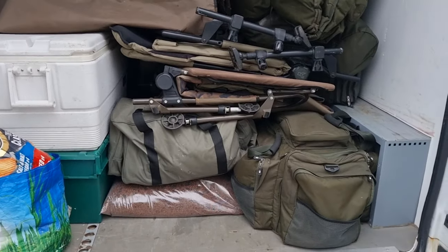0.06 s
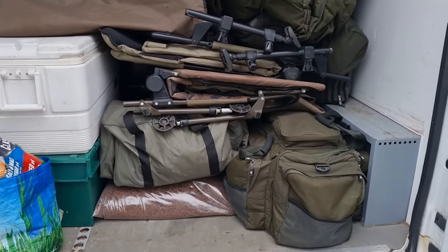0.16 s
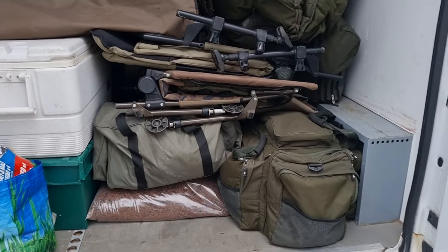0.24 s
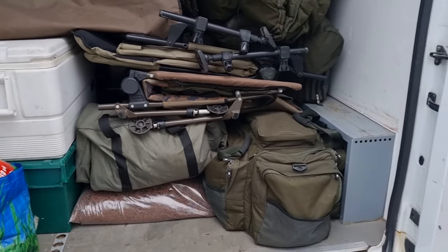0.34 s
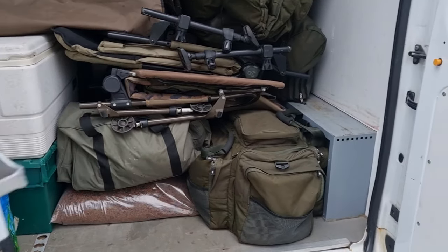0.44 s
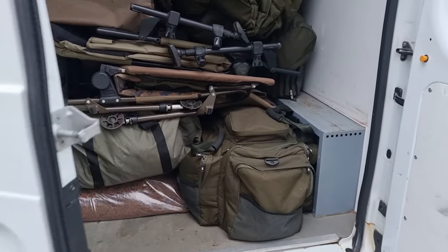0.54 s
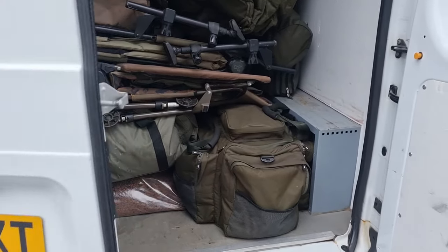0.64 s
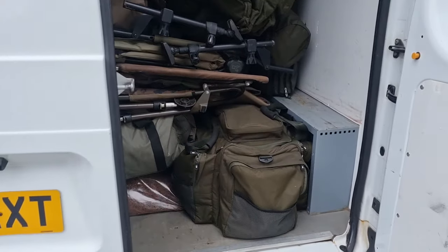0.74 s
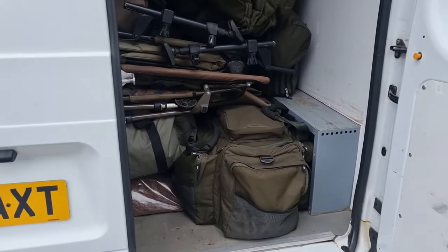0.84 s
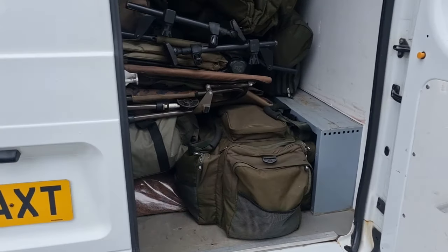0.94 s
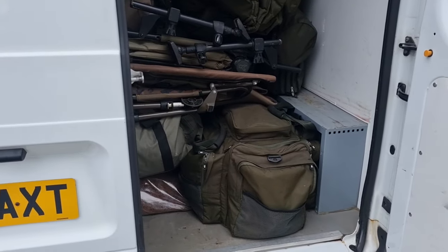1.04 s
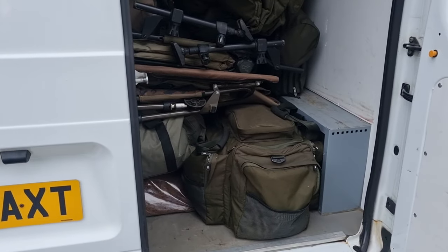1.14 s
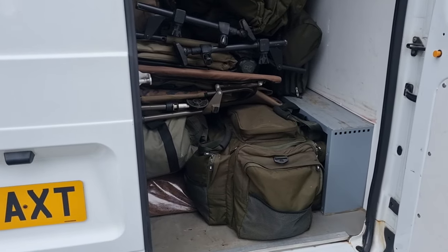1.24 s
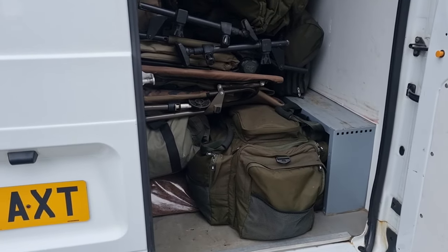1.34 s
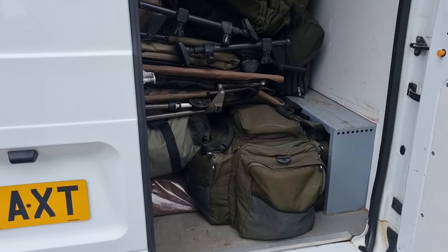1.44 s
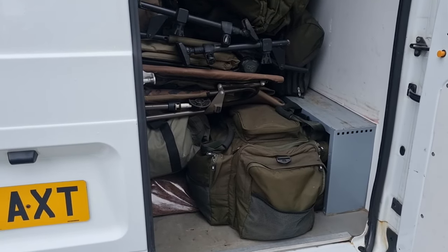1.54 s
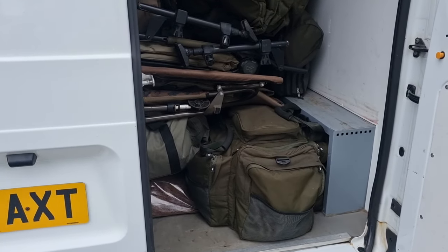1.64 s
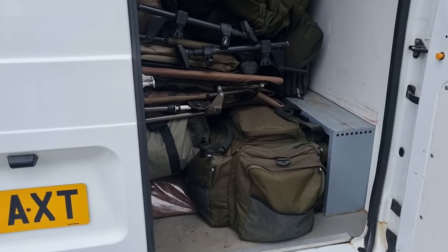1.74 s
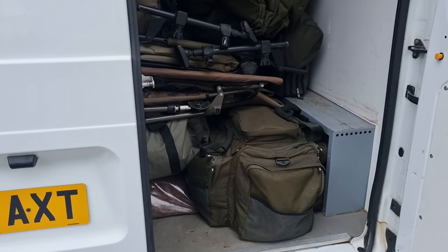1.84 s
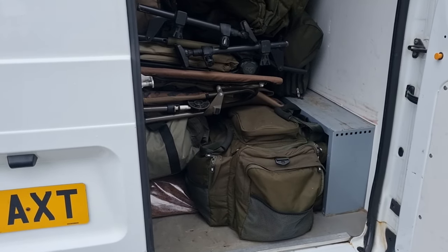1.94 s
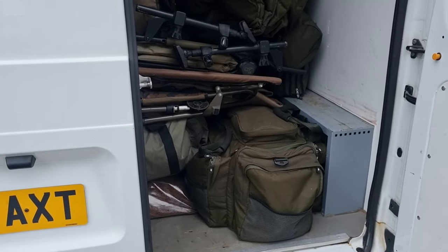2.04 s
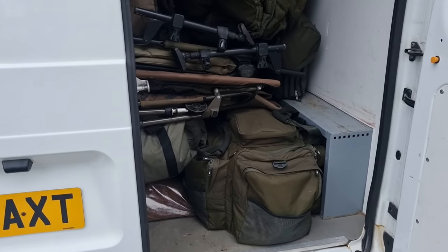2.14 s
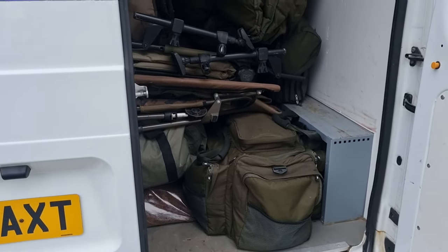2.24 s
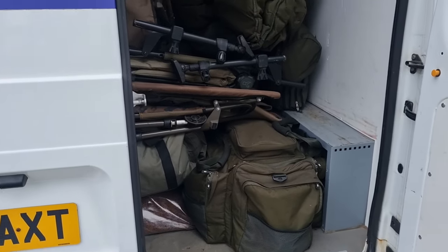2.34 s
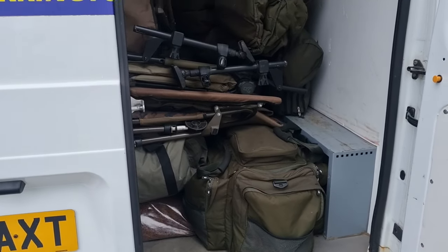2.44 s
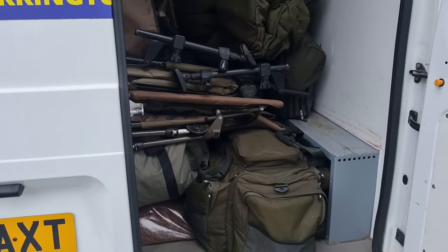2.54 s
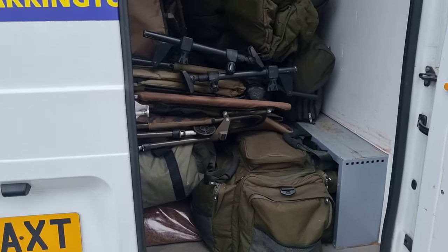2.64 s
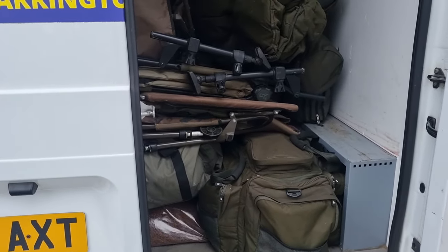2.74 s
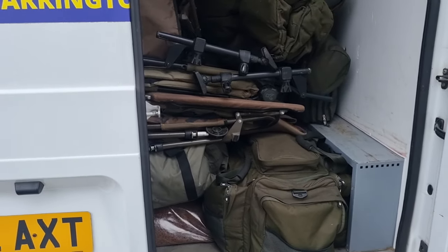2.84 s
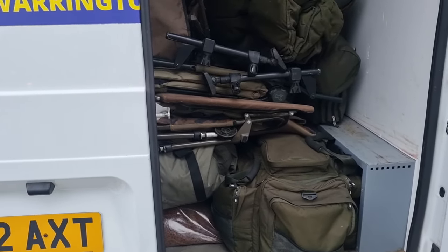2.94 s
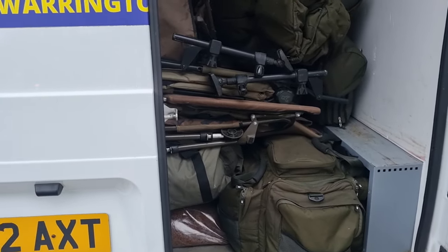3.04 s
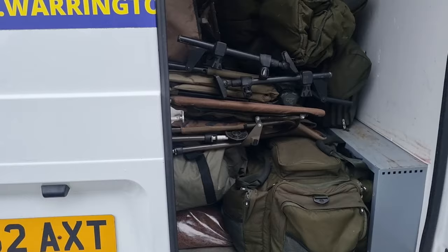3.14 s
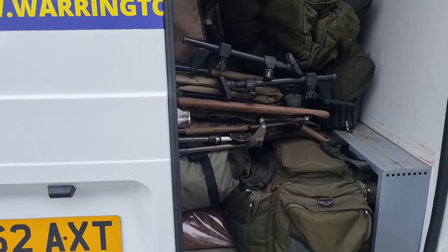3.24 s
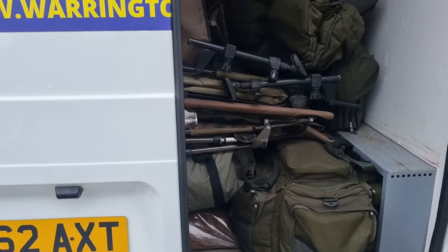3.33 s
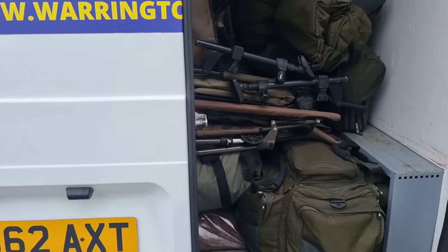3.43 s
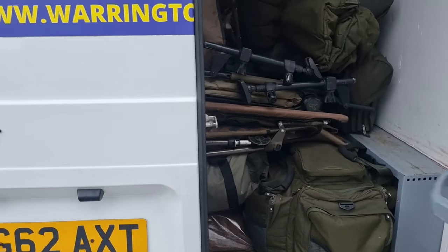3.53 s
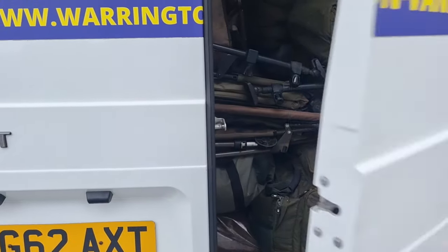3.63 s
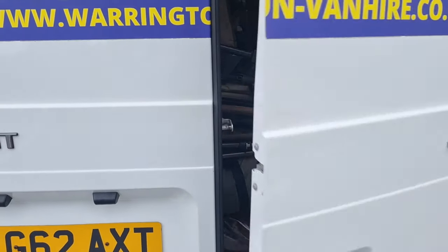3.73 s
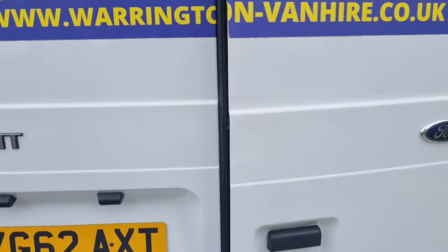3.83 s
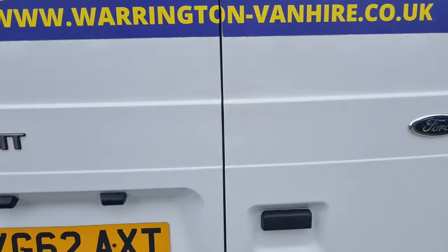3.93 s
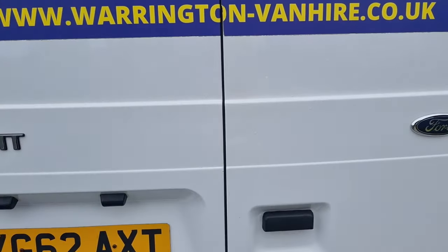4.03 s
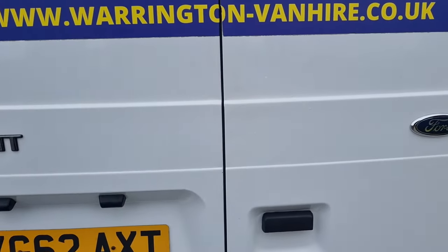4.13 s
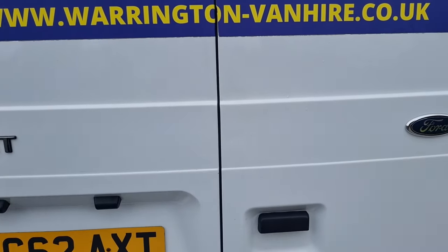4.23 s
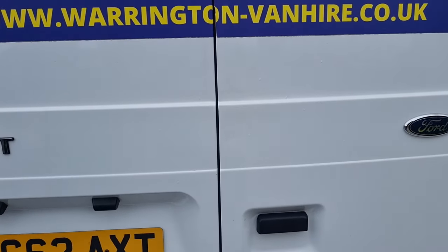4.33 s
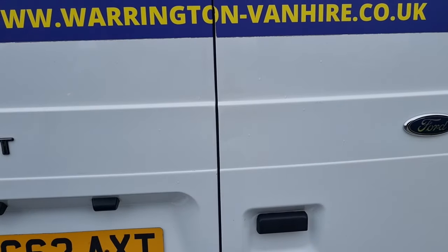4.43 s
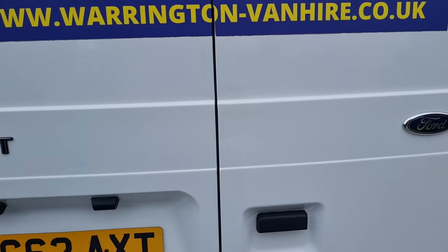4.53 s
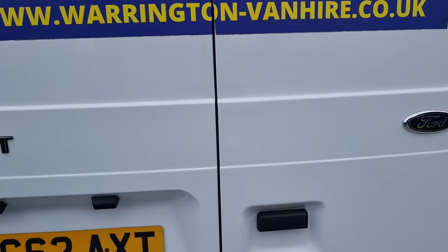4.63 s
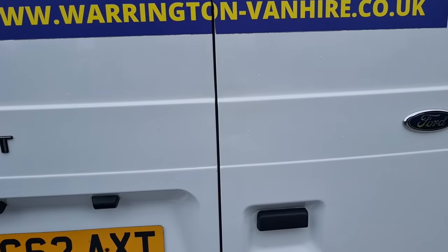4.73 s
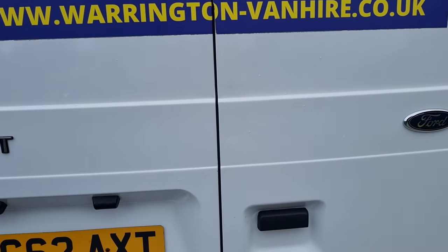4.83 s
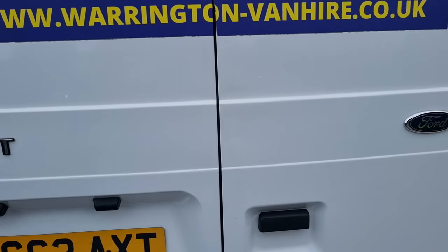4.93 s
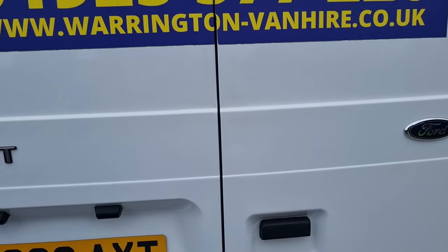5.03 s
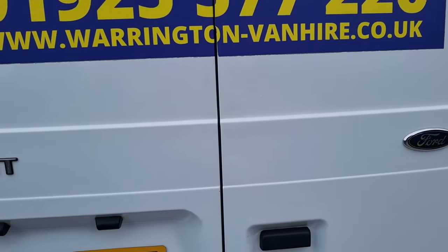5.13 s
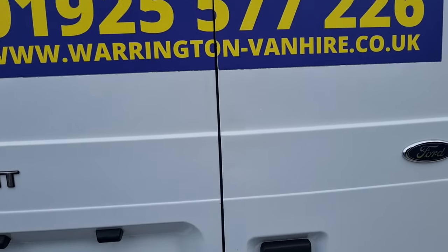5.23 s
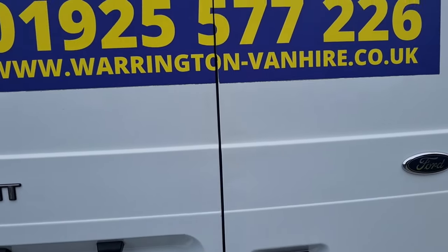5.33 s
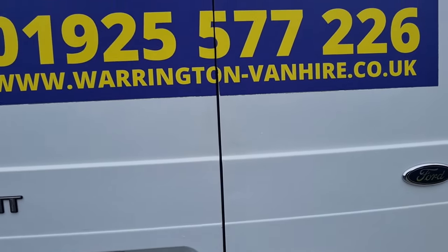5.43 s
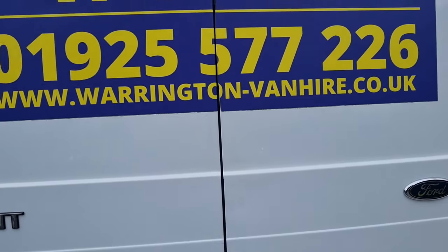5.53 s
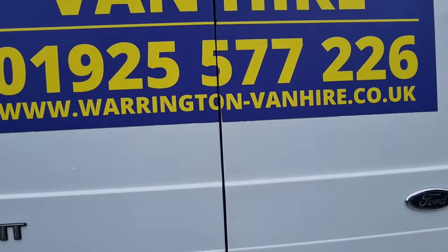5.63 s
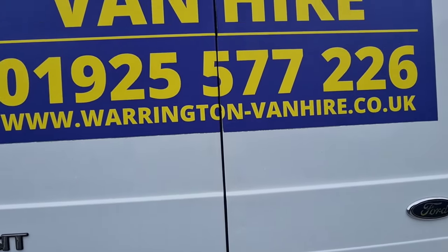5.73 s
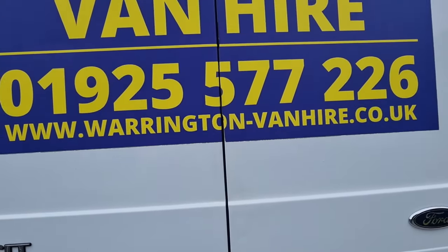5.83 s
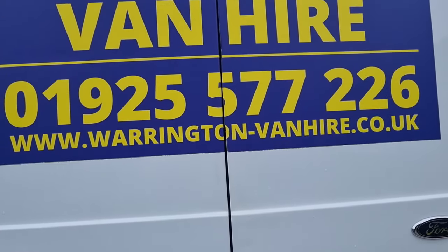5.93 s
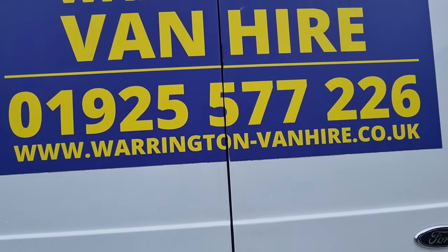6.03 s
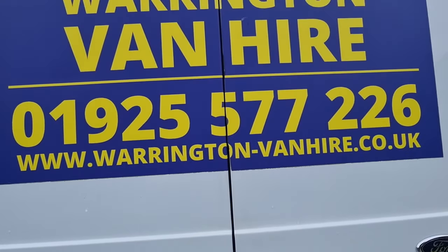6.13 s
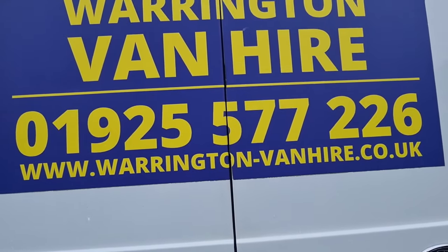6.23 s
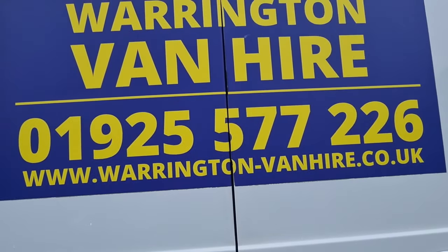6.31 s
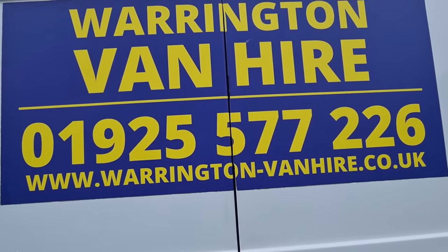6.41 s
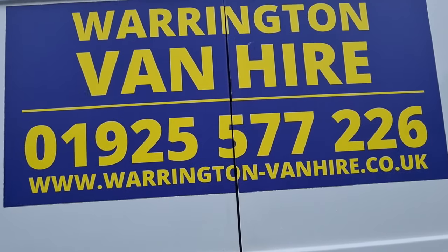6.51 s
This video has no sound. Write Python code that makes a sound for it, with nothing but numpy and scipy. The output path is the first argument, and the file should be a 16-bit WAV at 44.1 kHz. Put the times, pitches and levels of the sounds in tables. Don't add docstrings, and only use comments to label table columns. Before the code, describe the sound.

Outdoors on a street, a heavy vehicle swells past with engine rumble, tyre roar and whine. Around one second a loaded van's rear door slams very close, a cracking latch over booming sheet metal and loose rattles. As the vehicle recedes, small clicks and thin, high brake squeals follow. At four seconds the second door slams, thuddier, then quiet traffic hum remains. Handheld stereo microphone, loudest hits slightly clipped.

```python
import sys
import numpy as np
from scipy import signal
from scipy.fft import rfft, irfft, next_fast_len
from scipy.io import wavfile
from scipy.ndimage import uniform_filter1d

SR = 44100
rng = np.random.default_rng(int(sys.argv[2]) if len(sys.argv) > 2 else 0)


def decibels_to_gain(level_db):
    exponent = np.asarray(level_db, float) / 20
    return 10 ** exponent


def materialize(psi):
    bounded = np.clip(np.atleast_2d(psi).T, -1, 1)
    quanta = np.round(bounded * 32767).astype(np.int16)
    wavfile.write(sys.argv[1], SR, quanta)


N = 289737

# pitch in Hz, likeness from -1 to 1.
STREET_LIKENESS = [(60, 0.83), (130, 0.95), (290, 0.67), (640, -0.54), (1410, -0.52), (3100, 0.024),
                   (6820, -0.03), (15000, -0.57)]
# pitch in Hz, likeness from -1 to 1.
VAN_LIKENESS = [(60, 0.97), (250, 0.98), (600, 0.84), (4000, 0.21)]
# multiple of the pitch, level in dB at full grip.
SQUEAL_OVERTONES = [(1, 3.5), (2, -15.5), (3, -35), (4, -53)]


def evened(x):
    return x / np.sqrt(np.mean(x ** 2) + 1e-20)


def read(points, hz):
    f, value = np.transpose(points)
    return np.interp(np.log(hz + 1), np.log(f + 1), value)


def add(mix, s, sound):
    part = mix[:, round(s * SR):][:, :sound.shape[1]]
    part += sound[:, :part.shape[1]]


def panned(x, db):
    return x * np.array([decibels_to_gain(db / 2), decibels_to_gain(-db / 2)]).reshape(2, -1)


def drift(n, hz):
    pole = np.exp(-2 * np.pi * hz / SR)
    return evened(signal.lfilter([1], [1, -2 * pole, pole ** 2], rng.standard_normal(n)))


def slope(hz, lo_hz, hi_hz):
    return 1 / np.sqrt((1 + (lo_hz / (hz + 1)) ** 8) * (1 + (hz / hi_hz) ** 8))


def coloured(n, gain, alike=STREET_LIKENESS, lag_ms=0):
    size = next_fast_len(n)
    hz = np.fft.rfftfreq(size, 1 / SR)
    a, b = rfft(rng.standard_normal((2, size)))
    same = np.clip(read(alike, hz), -1, 1)
    late = np.exp(-2j * np.pi * hz * lag_ms / 1000)
    pair = np.array([a * late, same * a + np.sqrt(1 - same ** 2) * b])
    return evened(irfft(pair * gain(hz), size)[:, :n])


def nearness(t):
    # time in seconds, level in dB compared with the closest moment.
    traffic = [(0, -14), (.27, -13.5), (.48, -4), (.69, -1.5), (.93, 0), (1.15, -9.5), (1.45, -14),
               (1.98, -17), (2.21, -21), (3.0, -24.5), (3.35, -23.5), (3.77, -25.5), (4.6, -28),
               (4.96, -30.5), (5.3, -30.5), (5.85, -22.5), (6.25, -22.5), (6.57, -20)]
    return np.interp(t, *np.transpose(traffic))


def street():
    # pitch in Hz, level in dB per Hz.
    street_colour = [(15, -39.5), (25, -3.5), (53, 5), (86, -0.5), (179, -17.5), (235, -8.5), (324, -15.5),
                     (620, -26.5), (769, -22.5), (981, -23), (2030, -29), (3680, -35), (6310, -42.5),
                     (7600, -50), (9300, -64), (11000, -64.5), (13500, -59.5), (15800, -58)]
    # level in dB at closest, share of nearness, change in dB once both doors are shut.
    bands = [
        (-39.5, 0.24, -1.5),
        (-35.5, 0.6, -2),
        (-39.5, 0.6, 0),
        (-42, 1, -2),
        (-50.5, 0.89, 2),
        (-45.5, 0.92, -6),
    ]
    edges_hz = [55, 450, 1100, 2800, 5000, 8500, 20000]
    t = np.arange(N) / SR
    shut = t > 4.1
    colour = lambda hz: decibels_to_gain(read(street_colour, hz))
    out = decibels_to_gain(-105) * rng.standard_normal((2, N))
    out += decibels_to_gain(-56.5) * coloured(N, lambda hz: colour(hz) * slope(hz, 20, 55))
    streaks_db = 2.4 * rng.standard_normal(1200)
    streaks_hz = np.linspace(0, SR / 2, len(streaks_db))
    comb = lambda hz: decibels_to_gain(np.interp(hz, streaks_hz, streaks_db))
    for lo_hz, hi_hz, (db, share, shut_db) in zip(edges_hz[:-1], edges_hz[1:], bands):
        noise = coloured(N, lambda hz: colour(hz) * slope(hz, lo_hz, hi_hz) * comb(hz))
        patches_db = 1.55 * drift(N, 3.8)
        out += decibels_to_gain(db + share * nearness(t) + shut_db * shut + patches_db) * noise
    return out


def whine(start, end, from_hz, to_hz, db, spread, share, fade):
    n = round((end - start) * SR)
    hz = np.linspace(from_hz, to_hz, n)
    a, b = (drift(n, spread * from_hz) + 1j * drift(n, spread * from_hz) for _ in "ab")
    same = np.clip(read(STREET_LIKENESS, hz.mean()), -1, 1)
    pair = np.array([a, same * a + np.sqrt(1 - same ** 2) * b])
    pair = pair / (abs(pair) + 0.33) ** 0.78
    carried = (pair * np.exp(2j * np.pi * np.cumsum(hz) / SR)).real
    near_db = share * nearness(start + np.arange(n) / SR)
    return start, decibels_to_gain(db + near_db + 4.5) * carried * signal.windows.tukey(n, np.clip(fade, 0, 1))


def turning_parts(mix):
    # start in seconds, end in seconds, first pitch in Hz,
    # last pitch in Hz, level in dB at closest.
    tyres = [(0.48, .92, 2700, 2850, -42.5), (.3, 1.5, 2580, 2800, -41.5), (0.29, .97, 1800, 1880, -44.5),
             (.35, 0.79, 3600, 4000, -46)]
    drones = [(0, 0.955, 565, 574.3, -43), (0, 3.5, 290.6, 292.7, -45.5)]
    gears = [(1, 3.4, 7230, 6740, -53), (1.2, 2.95, 15600, 15200, -48), (1.95, 2.12, 15420, 15330, -46),
             (3.02, 3.3, 15150, 15060, -54), (1.6, 2.1, 8270, 8420, -62), (4.279, 4.56, 4500, 4900, -42.5),
             (5.7, 6.1, 5500, 5500, -66)]
    idle = [(.77, .96, 430, 436, -34), (0, 1.2, 152, 154.3, -47), (0, 0.946, 226.1, 229, -47.5),
            (0, 0.79, 416, 420.5, -43.5), (1.9, 4.1, 130.6, 146, -47), (5.5, 6.6, 149, 150, -50),
            (5, 6.605, 200, 226.7, -51.5), (5.503, 6.052, 95, 110.6, -46.5), (6.201, 6.7, 106.9, 119, -42)]
    motors = [(0.76, 1.2, 720, 780, -42.5), (5.55, 6.9, 1408, 1412, -44), (5.82, 6.05, 1411, 1410, -45),
              (5.7, 5.98, 4820, 4810, -64.5), (3.34, 3.405, 12900, 13100, -52), (4.8, 7.4, 888, 872, -49),
              (6.1, 6.5, 2465, 2480, -53.5), (6.45, 6.6, 2480, 2475, -51), (5.8, 6.0, 2720, 2720, -54),
              (1.7, 3.4, 1210, 1190, -50), (4.8, 5.05, 150, 170, -40.5), (3.34, 3.41, 5780, 5790, -51)]
    line_kinds = [
        (0.11, 0.92, 0.14),
        (0.18, 0.37, 0.081),
        (0.004, 0.88, 0.3),
        (.03, 0.26, 0.096),
        (0.005, 0.48, 0.21),
    ]
    for rows, kind in zip((tyres, drones, gears, idle, motors), line_kinds):
        for row in rows:
            add(mix, *whine(*row, *kind))


def tone(hz, db, waver, rough_db):
    n = len(hz)
    turns = np.cumsum(hz * (1 + waver * drift(n, 27))) / SR + rng.random()
    gain = np.sqrt(2) * decibels_to_gain(db + rough_db * drift(n, 35)) * signal.windows.tukey(n, .04)
    return gain, turns


def engine(mix):
    # start in seconds, end in seconds, pitch in Hz, level in dB.
    surges = [(0, 0.063, 72, -36.5), (0.093, 0.387, 72.5, -32), (0.36, 0.532, 75, -32.5),
              (0.534, 0.688, 74.7, -34), (0.696, 0.82, 70.6, -37), (0.829, 0.948, 70.5, -45),
              (1.293, 1.49, 68, -46), (1.437, 1.74, 64.6, -27.5), (1.743, 1.84, 68, -38),
              (1.882, 2.846, 69.26, -47.5), (2.853, 3.651, 68.8, -39), (3.655, 3.803, 65, -50),
              (3.796, 4.096, 71.6, -42.5), (4.558, 4.642, 70.5, -33), (4.651, 4.776, 72.2, -39.5),
              (4.754, 4.962, 73.6, -41.5), (5.014, 5.185, 68, -43), (5.204, 5.39, 68, -53),
              (5.393, 5.7, 75.2, -47.5)]
    for start, end, hz, db in surges:
        n = round((end - start) * SR)
        gain, turns = tone(np.full(n, hz), db, 0.005, 0.47)
        swell = np.hanning(n) ** 0.35
        add(mix, start, panned(gain * swell * np.sin(2 * np.pi * turns), .3))


def overtones(turns, level_db, harshness, full_db):
    lag = np.array([[0], [1.8]])
    harsh = lambda k: harshness * max(k - 2, 0) * (level_db + full_db)
    angle = 2 * np.pi * turns + lag
    return sum(decibels_to_gain(db + harsh(k)) * np.sin(k * angle) for k, db in SQUEAL_OVERTONES)


def grab(middle, length, hz, db, pan_db):
    n = round(length * SR)
    flutter = 0.38
    level_db = db + 10 * np.log10(np.hanning(n) + 1e-4)
    gain, turns = tone(np.full(n, hz), level_db, 0.011 * flutter, 4.3 * flutter)
    stack = overtones(turns, level_db, 1.9, 35)
    return middle - length / 2, panned(gain * stack, pan_db)


def held(rows, waver):
    s, hz, db, pan_db = np.transpose(rows)
    t = np.arange(s[0], s[-1], 1 / SR)
    level_db = np.interp(t, s, db) - 0.5
    gain, turns = tone(np.interp(t, s, hz), level_db, waver, 1.3)
    stack = overtones(turns, level_db, 1.0, 36.5)
    return s[0], panned(gain * stack, np.interp(t, s, pan_db))


def squeal():
    # middle in seconds, length in seconds, pitch in Hz, level in dB,
    # left-right balance in dB.
    grabs = [(2.625, 0.1, 3280, -53.5, 6), (2.647, 0.058, 3130, -57, -4), (2.87, 0.057, 3210, -65, -1),
             (2.857, 0.099, 3280, -57, -1), (2.901, 0.179, 3195, -57.5, -3),
             (2.992, 0.042, 3250, -59.5, -4), (3.06, .1, 3200, -64.5, -2), (3.138, .08, 3350, -69, -2),
             (3.555, 0.075, 3314, -57.5, -9), (3.661, 0.13, 3390, -72, 2), (3.756, .12, 3340, -63.5, -4.5),
             (4.825, .04, 3300, -58.5, -1), (4.866, .05, 3318, -63, -3), (4.922, .06, 3312, -63, -1),
             (4.962, .03, 3310, -69, -4), (5.01, .05, 3300, -68, -6), (5.09, .1, 3320, -76.5, -5)]
    # time in seconds, pitch in Hz, level in dB,
    # left-right balance in dB.
    squeals = [
        [(2.655, 3170, -61, -10), (2.677, 3178, -35.5, -7), (2.729, 3235, -44, -3), (2.735, 3160, -50.5, 11),
         (2.769, 3166, -32.5, -7), (2.783, 3110, -45, -7.5), (2.815, 3120, -31.5, -1), (2.84, 3200, -69, -4)],
        [(3.795, 3174, -58, -7), (3.805, 3197, -42.5, -5), (3.815, 3154, -40, -5), (3.837, 3143, -54, -1.5),
         (3.879, 3177, -38, 0.5), (3.905, 3144, -45, 2)],
        [(3.9, 3167, -44, 2), (3.93, 3137, -35, -2.5), (3.944, 3164, -51.5, -5), (3.96, 3150, -42.5, 1),
         (3.984, 3106, -52, -10), (3.998, 3220, -51, -6.5), (4.026, 3190, -54, -4.0), (4.035, 3165, -69, 0)],
        [(4.56, 3332, -64, 0.5), (4.584, 3310, -54, 6), (4.644, 3323, -48, 5), (4.67, 3325, -62, 1),
         (4.71, 3313, -46.5, -4.5), (4.735, 3334, -50.5, -3), (4.772, 3314, -51, -4), (4.8, 3320, -54, -3),
         (4.814, 3320, -68, -3.5)],
    ]
    direct = np.zeros((2, N))
    for row in grabs:
        add(direct, *grab(*row))
    for rows, waver in zip(squeals, (0.0039, 0.0028, .003, 0.00083)):
        add(direct, *held(rows, waver))
    t = np.arange(round(.4 * SR)) / SR
    echoes = rng.standard_normal((2, len(t))) * decibels_to_gain(-60 * t / 0.21) * (t > .01)
    echoes *= decibels_to_gain(-10.5) / np.linalg.norm(echoes[0])
    echoes[:, 0] = 1
    return signal.fftconvolve(direct, echoes, axes=1)[:, :N]


def click(s, db, ring_hz, pan_db, tilt_db):
    hz, t = np.fft.rfftfreq(1024, 1 / SR), np.arange(512) / SR
    chips = 0.26 * rng.standard_normal((2, len(t))) * decibels_to_gain(-60 * t / .006)
    chips[:, 0] = 1
    colour = decibels_to_gain(tilt_db * np.log2((hz + 200) / 4000)) * slope(hz, 700, 16000)
    colour = colour * decibels_to_gain(-10 / (1 + ((hz - 9800) / 1500) ** 4))
    colour = colour * (1 + 3.0 / (1 + 2j * (hz - ring_hz) / 900))
    sound = np.roll(irfft(rfft(chips, 1024) * colour), 64, 1)
    return s - 64 / SR, panned(decibels_to_gain(db) * sound / abs(sound).max(), pan_db)


def knock(s, db, ring_hz, pan_db, tilt_db, t60, ring_gain=0.87, chatter_db=0.0, tail_db=-24):
    # pitch in Hz, level in dB per Hz.
    crack = [(350, -34), (600, -7.5), (943, -6.5), (1220, -3), (1310, -9.5), (1480, -2.5), (1820, -10.5),
             (4130, -14.5), (4740, -14), (7240, -16), (9020, -25.5), (13800, -23.5), (15800, -23.5)]
    t = np.arange(round(.2 * SR)) / SR
    bright_hz = 15500 if s > 3 else 13400
    bump = lambda hz, at_hz, width: 1 / (1 + ((hz - at_hz) / width) ** 2)
    ring = lambda hz: 1 + ring_gain * bump(hz, ring_hz, 250) + 1.9 * bump(hz, bright_hz, 910)
    lean = lambda hz: tilt_db * (np.log2((hz + 50) / 4000) + (hz / 11000) ** 2)
    colour = lambda hz: decibels_to_gain(read(crack, hz) + lean(hz)) * ring(hz)
    chatter = decibels_to_gain(chatter_db * drift(len(t), 300))
    dying = decibels_to_gain(-60 * t / max(t60, .008)) + 0.508 * decibels_to_gain(-60 * t / 0.0069)
    tail = decibels_to_gain(tail_db - 60 * t / 0.56)
    shape = (1 - np.exp(-t / 0.0011)) * (chatter * dying + tail)
    shape *= np.minimum((t[-1] - t) / 0.1, 1)
    return s, panned(decibels_to_gain(db - 5.0) * shape * coloured(len(t), colour, VAN_LIKENESS, 0.301), pan_db)


def small_parts(mix):
    # time in seconds, peak in dB, ringing pitch in Hz,
    # left-right balance in dB, brightness in dB per octave.
    taps = [(1.9984, -45, 4250, 8, -1.5), (2.592, -44, 4400, -8, -2.3), (3.017, -45, 4650, -4, 0),
            (3.0779, -50, 6800, -10, 2.5), (3.4211, -22, 7700, 4, 3.5), (3.4225, -32.5, 2250, -5, 1),
            (5.39, -45.5, 3600, 6, -3.5), (3.4375, -37.5, 7600, -1, -0.5), (3.9544, -48, 3600, -7, 0)]
    rattles = [(1.0054, -18, 7500, -6, 2.5), (1.0254, -24, 3450, -3, 1), (1.054, -17.5, 3040, 5, 1.5),
               (1.060, -27, 3500, 4, -2), (1.089, -17, 2100, 5.5, 3), (1.1124, -23.5, 5500, 7, -4.5),
               (4.1744, -22, 6200, -6.5, -3), (4.184, -26, 6000, -3, -2.5), (4.1979, -24, 3570, 0.5, -2.5),
               (4.2069, -26, 2600, -4, -4), (4.2189, -25.5, 2200, 0, -4.5), (4.235, -23, 6360, -5.5, -4.5),
               (4.244, -25.5, 6000, -3, -5.5), (4.2593, -28.5, 7400, -5, -1), (4.267, -28.5, 3000, -7, -3)]
    ticks = [(4.1395, -33, 12000, -2, 4), (1.0555, -14, 2100, 3.5, 2), (1.0895, -11, 13800, 2, 5),
             (4.0605, -7.5, 2000, -3, -1.5), (4.0625, -0.5, 820, -3, -9)]
    clicks = [(2.0309, -29, 4180, 3, -1), (2.062, -49, 12100, 6, 3), (2.095, -39, 5000, 9, -6),
              (2.133, -28, 7200, 14, -3.5), (2.1365, -42, 15300, 6, 6), (3.018, -44, 4650, -4, 1),
              (3.078, -42, 6800, -6, 2), (3.4232, -24, 7700, 7, 7), (3.427, -24, 15000, 4, 6),
              (5.3946, -53, 3740, 4, -1), (5.402, -47, 1100, 4, -6), (5.42, -52, 3500, 3, -4),
              (5.439, -46, 1700, 0, -3), (4.2385, -23.5, 2100, -5, -6), (4.2593, -28, 8000, -4, -2),
              (4.198, -25, 3500, -4, -5), (4.175, -34, 6200, -5, -3), (.9563, -10, 6000, 4, 1),
              (.9952, -11, 14200, 2, 3), (1.0055, -14, 7500, 0, 0), (1.0145, -16, 2504, 2, -2),
              (1.054, -18, 2100, 3, 0), (1.09, -17, 13500, 4, 3), (4.0596, -10, 2100, -2, -4),
              (4.0744, -14.5, 7300, -4, -3)]
    # time in seconds, peak in dB, ringing pitch in Hz.
    pings = [(5.296, -53.5, 4700), (5.57, -52, 4750), (5.68, -67, 4820), (6.07, -70, 4880),
             (6.385, -62.5, 4820)]
    for row in taps:
        add(mix, *knock(*row, 0.063, ring_gain=2.4, chatter_db=4.5, tail_db=-24.5))
    for row in rattles:
        add(mix, *knock(*row, .05, ring_gain=2.5, chatter_db=1.5, tail_db=-26.5))
    for row in ticks:
        add(mix, *knock(*row, 0.0082, ring_gain=1.6, chatter_db=0.0, tail_db=-36))
    for row in clicks:
        add(mix, *click(*row))
    for s, db, hz in pings:
        add(mix, *knock(s, db, hz, 0, -1.6, 0.078, ring_gain=19, chatter_db=3.0, tail_db=-28.5))


def thumps(mix):
    # time in seconds, peak in dB, pitch in Hz, time in seconds to die by 60 dB.
    panel_swings = [(.948, -8.5, 68, .25), (1.005, -13.5, 374, .25), (1.02, -11, 169, 0.22),
                    (4.054, -8, 75, .1), (4.058, -7.5, 150, 0.063), (4.092, -6.5, 61.7, .16),
                    (4.19, -14, 110, .3), (4.33, -20, 189.9, 0.38), (.945, -17.5, 32, .4),
                    (1.09, -14, 105.3, 0.33), (1.12, -18, 371, .2), (4.112, -7.5, 139.3, 0.18),
                    (4.158, -13, 151.4, 0.26), (4.266, -12.5, 186.5, .25)]
    t = np.arange(round(.35 * SR)) / SR
    for s, db, hz, t60 in panel_swings:
        swing = np.sin(2 * np.pi * hz * (t - 0.1 * t ** 2))
        swing *= (1 - np.exp(-t / 0.004)) * decibels_to_gain(db - 60 * t / t60)
        add(mix, s, panned(swing * np.minimum((t[-1] - t) / .05, 1), 0))


def modes(hz, table, sharp):
    return sum(decibels_to_gain(db) / (1 + 2j * (hz - f) / (w * sharp)) for f, w, db in table)


def steadied(x, seconds):
    power = uniform_filter1d((x ** 2).mean(0), round(seconds * SR))
    return x / np.sqrt(power + 0.19)


def shaking(blows, share, trim_db, rise, t60, tail_db, stretch):
    s, db, heft_db = np.transpose(blows)[:, :, None]
    u = np.maximum(np.arange(round(.9 * SR)) / SR - (s - s[0]), 0)
    each = (1 - np.exp(-u / rise)) * decibels_to_gain(db + share * heft_db + trim_db)
    dying = decibels_to_gain(-60 * u / t60)
    tail = decibels_to_gain(tail_db - 60 * u / (t60 * stretch))
    return np.sqrt((each ** 2 * (dying ** 2 + tail ** 2)).sum(0))


def door(blows, parts, panel, frame):
    tail_stretch = (5.18, 3.14, 2.7, 2.6)
    booming, ringing, clanging, shuddering = (
        shaking(blows, *part, stretch) for part, stretch in zip(parts, tail_stretch))
    n = len(booming)
    boom_colour = lambda hz: (modes(hz, panel, 0.93) + decibels_to_gain(-24.5)) * slope(hz, 42, 132) ** .7
    ring_colour = lambda hz: (modes(hz, panel, 1.48) + decibels_to_gain(-23.0)) * slope(hz, 83, 275)
    clang_colour = lambda hz: (modes(hz, panel, 1.1) + decibels_to_gain(-14.5)) * slope(hz, 280, 520) ** .6
    shudder_colour = lambda hz: (modes(hz, frame, 1.0) + decibels_to_gain(-7.5)) * slope(hz, 480, 1900)
    boom = coloured(n, boom_colour, VAN_LIKENESS, 0.35)
    ring = coloured(n, ring_colour, VAN_LIKENESS, 0.4)
    clang = coloured(n, clang_colour, VAN_LIKENESS, 0.45)
    shudder = coloured(n, shudder_colour, VAN_LIKENESS, 0.37)
    shaken = booming * steadied(boom, 0.024) + ringing * steadied(ring, 0.021)
    shaken += clanging * steadied(clang, 0.014) + shuddering * steadied(shudder, 0.02)
    return blows[0][0], shaken * np.minimum(np.arange(n)[::-1] / (0.15 * SR), 1)


def slams(mix):
    # time in seconds, strength in dB, heft in dB (more boom, less shudder).
    door_blows = [
        [(.938, -21.5, -5), (.951, -13, 0.5), (.964, -17.5, -2), (.985, -11.5, -2), (1.028, -8, 0),
         (1.1, -14, 2.5), (1.148, -23.5, 5), (1.26, -32.5, 9)],
        [(4.03, -37, -6), (4.0435, -18.5, -5.5), (4.058, -13, -2.5), (4.1, -12, 4.5), (4.125, -24.5, 5),
         (4.195, -13.5, 6.5), (4.235, -20.5, 16.5), (4.272, -18, 10)],
    ]
    # share of heft, trim in dB,
    # rise in seconds, time in seconds to die by 60 dB, late tail in dB.
    door_parts = [
        [(0.9, -3.5, 0.0053, 0.43, -13.5), (0.68, -1, 0.0073, 0.39, -13), (0.06, -1.5, 0.0043, 0.3, -17.5),
         (-3, -4, .004, 0.17, -19)],
        [(0.37, 1.2, 0.0032, 0.2, -10.5), (0.24, -3, 0.0083, 0.32, -9), (-0.34, -9, 0.0053, 0.3, -12.5),
         (-1.6, -4, .004, 0.22, -14.5)],
    ]
    # pitch in Hz, width in Hz, level in dB.
    panels = [
        [(57.4, 7.4, -1.5), (70.7, 9.3, 0.5), (96.4, 11, 2.5), (132, 5.7, -1.5), (156, 52, -5), (194, 5.9, -5),
         (233.6, 20, -15.5), (310, 53, -16.5), (338.6, 25, -4), (371.7, 14, 1.5), (434, 13, -5.5)],
        [(36, 14, -19), (53.7, 23, 7), (68, 30, 1), (94, 16.6, 2), (128, 76, -7), (145, 27, 6),
         (190.7, 9.3, 1.5), (210, 23, -4), (246, 11, -31), (305, 17, 1.5), (343, 24, -8.5)],
    ]
    # pitch in Hz, width in Hz, level in dB.
    frames = [
        [(519, 25, 2.5), (568, 24, 0), (875, 40, 1), (1100, 100, -0.5), (1515, 43, -9), (1880, 67, -16)],
        [(514, 11, -5), (750, 97, 0.5), (923, 7.9, 11.5), (1210, 45, -20), (1220, 16, -1), (1890, 190, -8.5)],
    ]
    # time in seconds, peak in dB, ringing pitch in Hz,
    # left-right balance in dB, brightness in dB per octave.
    door_knocks = [
        [(0.9388, -9.5, 3700, 2.5, -3), (0.945, -8.5, 1100, -1.5, -1.5), (0.9558, -7, 3100, 5, 0),
         (0.9634, -11, 3250, 0, 5.5), (0.9795, -8.5, 3325, 7.5, -0.5), (0.9954, -7, 4040, 5, 2.5),
         (1.0024, -13, 7530, -1, 4.5), (1.0146, -11.5, 3310, 1, -5), (1.3494, -36, 2900, 2.5, 0.3)],
        [(4.0438, -17, 1200, -3, -6.5), (4.0592, -9.5, 3080, 2, -1), (4.0702, -11, 2940, 2, 2),
         (4.0744, -14, 7300, -6, -3.5), (4.0854, -15, 3900, -8, -4.5), (4.1041, -11.5, 3340, -8, -4.5),
         (4.1172, -15, 3460, -9, -11.5)],
    ]
    knock_t60 = (0.085, 0.075)  # seconds, one a door
    tables = zip(door_blows, door_parts, panels, frames, door_knocks, knock_t60)
    for blows, parts, panel, frame, knocks, t60 in tables:
        add(mix, *door(blows, parts, panel, frame))
        for row in knocks:
            add(mix, *knock(*row, t60))


def scene():
    mix = street() + squeal()
    turning_parts(mix)
    engine(mix)
    small_parts(mix)
    thumps(mix)
    slams(mix)
    return mix


def low_pass(x):
    return signal.sosfilt(signal.butter(12, 16820, fs=SR, output="sos"), x)


def record(dry):
    size = next_fast_len(N)
    hz = np.fft.rfftfreq(size, 1 / SR)
    shelf = decibels_to_gain(-40 / (1 + np.exp((15880 - hz) / 40)))
    loud = irfft(rfft(dry, size) * shelf, size)[:, :N]
    bent = loud / (1 + abs(loud / 1.3) ** 4) ** .25
    return low_pass(np.clip(bent, -1, 1))


dry = scene()
out = record(dry)
materialize(out)
```